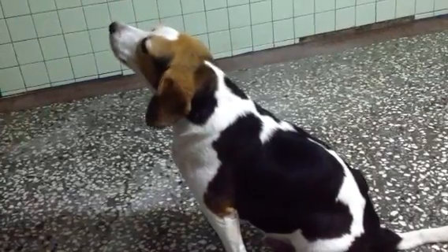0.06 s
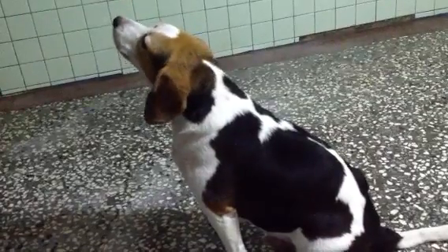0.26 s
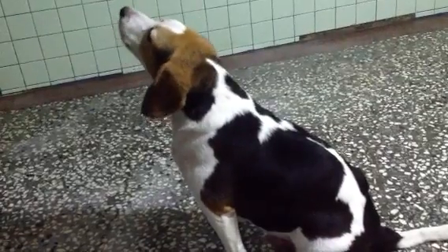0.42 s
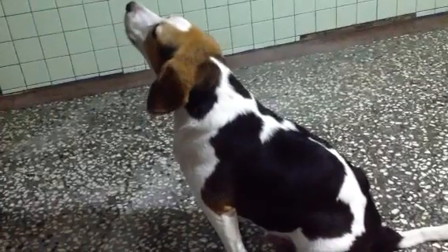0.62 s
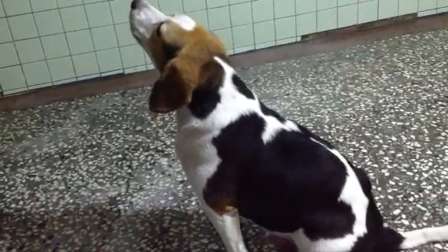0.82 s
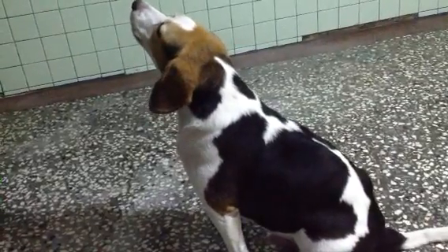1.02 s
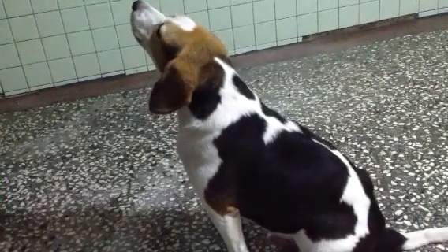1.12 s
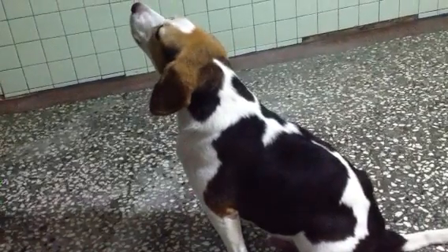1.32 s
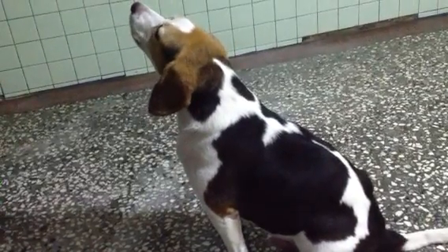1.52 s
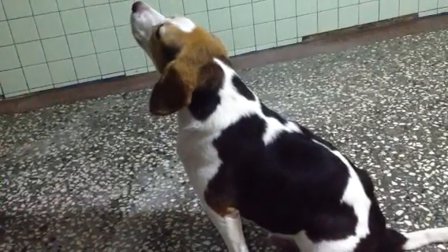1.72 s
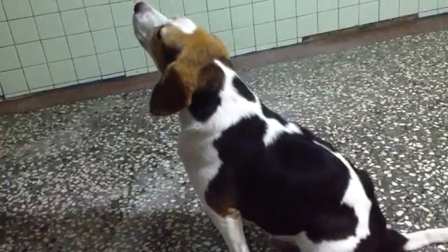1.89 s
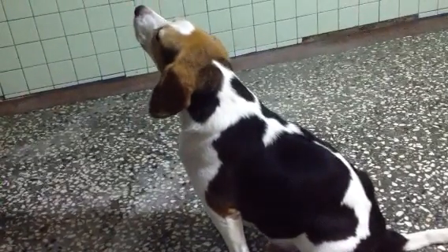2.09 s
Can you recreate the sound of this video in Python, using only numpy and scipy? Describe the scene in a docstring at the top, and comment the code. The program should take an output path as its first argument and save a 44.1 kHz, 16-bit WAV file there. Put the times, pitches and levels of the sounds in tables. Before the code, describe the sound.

A beagle gives one long, clear howl, rising early, then sinking in two steps and breaking off in small catches; a hard tiled room rings around it, close microphone, faint room noise.

```python
"""A beagle gives one long howl in a tiled room with a stone floor, over faint room noise.
The pitch rises, then sinks in two steps. Five harmonics on one gliding pitch carry the tone; flickering overtones
and pulsing breath noise ride on it, and the hard walls ring on as a dense tail of decaying noise.
A soft rush of shaped noise comes early; held-over notes beat with the new pitch and a few low bumps pass beneath.
At the end the voice catches in short, unsteady bursts, and a last soft rush of air follows."""
import sys
import numpy as np
from scipy import signal
from scipy.fft import rfft, irfft
from scipy.io import wavfile

SR = 44100
rng = np.random.default_rng(int(sys.argv[2]) if len(sys.argv) > 2 else 0)


def bounce(signal):
    """Save signal as a 16-bit WAV file at the path given by the first command-line argument."""
    frames = np.transpose(np.atleast_2d(signal))
    limited = np.clip(frames, -1, 1)
    pcm = np.round(limited * 32767).astype(np.int16)
    wavfile.write(sys.argv[1], SR, pcm)


N = 94815

# Centre line of the howl's pitch: start_s, pitch_hz
PITCH = [(0, 376.8), (0.11, 382.8), (0.23, 377.2), (0.32, 368.2), (0.38, 375.7), (0.44, 401), (0.55, 407.9),
         (0.66, 405.3), (0.81, 400.9), (0.9, 390.2), (0.96, 378.6), (1.02, 362.3), (1.1, 360.3),
         (1.22, 363.1), (1.36, 360.1), (1.49, 349.3), (1.6, 334.4), (1.7, 336.7), (1.82, 335.6)]


def undb(db):
    """Decibels to an amplitude factor."""
    return 10 ** (np.asarray(db) / 20)


def curve(table, column):
    """One column of a table, joined by straight lines in time."""
    rows = np.array(table)
    return np.interp(np.arange(N) / SR, rows[:, 0], rows[:, column])


def colour(hz, points):
    """Gain of a spectrum at hz, falling 120 dB per octave beyond its ends."""
    f, db = np.array(points).T
    octaves_beyond = np.abs(np.log2((hz + 1) / np.clip(hz + 1, f[0], f[-1])))
    return undb(np.interp(np.log(hz + 1), np.log(f), db) - 120 * octaves_beyond)


def unit(x):
    """Scale to an rms of 1."""
    return x / np.sqrt(np.mean(x ** 2))


def noise(points):
    """Noise of a given colour, rms 1."""
    spectrum = rfft(rng.standard_normal(N))
    return unit(irfft(spectrum * colour(np.fft.rfftfreq(N, 1 / SR), points), N))


def walk(hz):
    """Smooth random drift up to a given rate, rms 1."""
    smoother = signal.butter(2, hz, fs=SR, output="sos")
    return unit(signal.sosfilt(smoother, rng.standard_normal(N)))


def swell(at, length):
    """A bell-shaped envelope, down to 1/e at one length either side of its peak."""
    return np.exp(-((np.arange(N) / SR - at) / length) ** 2)


def room_noise():
    """Steady noise, strongest in the low mids."""
    # Spectrum of the room noise: frequency_hz, relative_level_db
    floor_colour = [(30, -30.5), (80, -16), (110, -14.5), (160, 2.5), (300, 2), (700, 5), (1200, -10.5),
                    (2000, -26), (3600, -21), (4800, -22.5), (6500, -11), (9000, -15), (12300, -15),
                    (14000, -28.5)]
    floor_db = -53
    return undb(floor_db) * noise(floor_colour)


def harmonic_levels():
    """Level curves in dB of harmonics 1-5, before trim and wobble."""
    # The two strong harmonics: start_s, first_db, second_db
    low_harmonics = [(0.0, -22, -34), (0.076, -32, -31.5), (0.106, -28, -41), (0.152, -24, -29),
                     (0.186, -27, -29), (0.278, -20, -19.5), (0.304, -19, -36), (0.334, -20.5, -22.5),
                     (0.354, -16, -30.5), (0.384, -12, -24), (0.43, -15, -16), (0.48, -15, -16.5),
                     (0.5, -9, -25), (0.592, -7.5, -27.5), (0.648, -10.5, -26.5), (0.76, -24.5, -18.5),
                     (0.8, -32.5, -20.5), (0.84, -14, -17.5), (0.866, -14.5, -17.5), (0.902, -16.5, -31),
                     (0.926, -22, -28.5), (0.958, -15, -20), (1.028, -21.5, -12.5), (1.068, -17.5, -7),
                     (1.104, -23, -13), (1.154, -24, -7.5), (1.242, -23, -12), (1.358, -24, -10),
                     (1.394, -26, -26.5), (1.428, -25.5, -11.5), (1.494, -36, -21), (1.748, -32, -16),
                     (1.82, -35, -17)]
    # The next three: start_s, third_db, fourth_db, fifth_db
    mid_harmonics = [(0, -65, -51.5, -52.5), (0.18, -71.5, -48, -65), (0.25, -39, -35, -48.5),
                     (0.3, -42.5, -31, -42.5), (0.37, -30, -23, -44), (0.44, -41, -28, -57.5),
                     (0.52, -40, -29.5, -55), (0.62, -45.5, -24, -59), (0.72, -49, -23, -55.5),
                     (0.81, -35, -32, -61.5), (0.88, -47.5, -29.5, -56), (0.95, -49.5, -34.5, -64.5),
                     (1.02, -48, -25.5, -43.5), (1.13, -51.5, -32.5, -37.5), (1.22, -55, -33.5, -48),
                     (1.3, -49, -31.5, -63), (1.37, -47.5, -41.5, -27), (1.44, -40.5, -32.5, -38.5),
                     (1.5, -41.5, -39.5, -22), (1.57, -45, -41.5, -42.5), (1.64, -38, -37, -37.5),
                     (1.74, -36, -35, -38.5), (1.83, -38, -47, -32.5)]
    low = [curve(low_harmonics, column) for column in (1, 2)]
    mid = [curve(mid_harmonics, column) for column in (1, 2, 3)]
    return low + mid


def vocal_folds(phase, levels):
    """The folds sound five harmonics locked to one phase, each shimmering and fluttering in level."""
    # Trim of harmonics 1-5: trim_db
    trim = [-1.3, 0.23, -0.06, -0.76, -1.5]
    # Flutter of harmonics 1-5, mostly deeper in the upper three: rms_depth_db
    flutter = [.2, 0.66, 3, 1.9, 1.9]
    flutter_hz = 20.1
    shimmer_db, shimmer_hz = 0.133, 121
    tone = 0
    for k, db in enumerate(levels):
        wobble_db = shimmer_db * walk(shimmer_hz) + flutter[k] * walk(flutter_hz)
        tone = tone + undb(db + trim[k] + wobble_db) * np.sqrt(2) * np.sin((k + 1) * phase)
    return tone


def throat_air(levels, puffs):
    """Air rasps through the throat in puffs, louder as the harmonics grow."""
    # Spectrum of the rasp: frequency_hz, relative_level_db
    rasp_colour = [(120, -6), (300, -23), (400, 5), (550, -14.5), (750, 20.5), (950, -4.5), (1200, -23),
                   (1350, 4), (1600, -5), (1800, 12), (2050, -41), (3000, -45)]
    rasp_db = -36  # relative to the untrimmed harmonics
    effort = np.sqrt(sum(undb(db) ** 2 for db in levels))
    return undb(rasp_db) * effort * puffs * noise(rasp_colour)


def flickering_overtone(order, phase):
    """One high harmonic whose level drifts slowly up and down."""
    flicker_db, flicker_hz = 4.5, 4.3
    start_phase = rng.uniform(0, 2 * np.pi)
    return undb(flicker_db * walk(flicker_hz)) * np.sin(order * phase + start_phase)


def treble(hz, phase, puffs):
    """Three ranges of thin overtones, each mixed with pulsing hiss of the same colour."""
    # Range levels before the shares below: start_s, range_2_4_khz_db, range_6_10_khz_db, above_11_khz_db
    treble_levels = [(0, -59, -53.5, -59), (0.22, -51.5, -52.5, -63), (0.32, -54.5, -43.5, -49),
                     (0.4, -42, -34, -49.5), (0.47, -42.5, -29.5, -44), (0.58, -50, -30.5, -43.5),
                     (0.7, -45, -38, -44.5), (0.82, -46.5, -41, -46.5), (0.91, -50.5, -41.5, -48),
                     (1.02, -48.5, -37.5, -47.5), (1.1, -55, -40, -52.5), (1.2, -55, -43.5, -54),
                     (1.4, -52, -44, -53), (1.52, -56.5, -48, -56.5), (1.66, -52.5, -45.5, -50),
                     (1.79, -57.5, -48.5, -49), (1.84, -63, -49.5, -54)]
    # Colours of the three ranges, low to high: frequency_hz, relative_level_db
    presence = [(1980, -9), (2160, 5.5), (2330, -12), (2450, 5.5), (2680, 2.5), (2900, -11), (3100, -3.5),
                (3270, 2), (3480, -13.5), (3720, -2.5), (4050, -15.5), (4350, -17), (4700, -21),
                (5400, -16.5)]
    whistle = [(5400, -37), (6200, -9.5), (6900, -9.5), (7450, -15), (8100, 0), (8600, 3), (9050, 5),
               (9350, -14.5), (9750, -1), (10300, -29), (11000, -22.5)]
    top = [(10500, -11.5), (11300, -6.5), (12000, 4), (12600, -1), (13100, -8.5), (13700, -10.5),
           (15400, -9.5)]
    # Clean and airy share of each range, low to high: share_db
    clean_share = [-6, -8, -11]
    hiss_share = [-13.5, -16.5, -8.5]
    out = 0
    for i, shape in enumerate([presence, whistle, top]):
        low_hz, high_hz = shape[0][0], shape[-1][0]
        orders = [k for k in range(6, 46) if k * hz.max() > low_hz and k * hz.min() < high_hz]
        lines = unit(sum(colour(k * hz, shape) * flickering_overtone(k, phase) for k in orders))
        hiss = puffs * noise(shape)
        mix = undb(clean_share[i]) * lines + undb(hiss_share[i]) * hiss
        out = out + undb(curve(treble_levels, i + 1)) * mix
    return out


def howl():
    """Vocal folds, throat air and treble share one unsteady pitch, with held-over notes added."""
    jitter, jitter_hz = 0.0014, 142  # rms share of the pitch, fastest rate
    waver, waver_hz = 0.0023, 22.6
    attack_s = 0.008
    end_s, release_s = 1.8105, 0.061
    t = np.arange(N) / SR
    hz = curve(PITCH, 1) * (1 + jitter * walk(jitter_hz) + waver * walk(waver_hz))
    phase = 2 * np.pi * np.cumsum(hz) / SR
    puffs = unit(1 + 0.18 * np.cos(phase))  # the air pulses once a cycle
    levels = harmonic_levels()
    voice = vocal_folds(phase, levels) + throat_air(levels, puffs) + treble(hz, phase, puffs)
    attack = np.minimum(t / attack_s, 1)
    release = np.exp(-(np.maximum(t - end_s, 0) / release_s) ** 2)
    return voice * attack * release + lingering(phase)


def room(x):
    """Tiles and stone add a dense tail, with its own level and decay in each band."""
    # Tail in each band: centre_hz, level_db
    tail_levels = [(200, -14), (380, -15), (720, -15), (1100, -8), (1600, -5), (3000, -1), (8500, 1),
                   (15000, 0)]
    # Time to fall 60 dB in those bands: decay_s
    tail_decays = [.55, 1, 0.65, 1, 0.91, 1, 0.25, 0.35]
    delay_s = 0.005804
    t, f = np.arange(SR) / SR, np.fft.rfftfreq(SR, 1 / SR)
    centres = np.log([row[0] for row in tail_levels])
    scatter, tail = rfft(rng.standard_normal(SR)), 0
    # Each row of the identity matrix gives one band, crossfading into its neighbours
    for share, (_, db), t60 in zip(np.eye(len(tail_levels)), tail_levels, tail_decays):
        band = irfft(scatter * np.interp(np.log(f + 1), centres, share), SR)
        fade = undb(-60 * t / t60) * (t > delay_s)
        tail = tail + undb(db) * band * fade / np.linalg.norm(fade)
    return x + signal.fftconvolve(x, tail)[:N]


def air_rushes():
    """Soft rushes of air: shaped noise that swells and sinks."""
    # Rushes: peak_s, half_width_s, peak_level_db
    rushes = [(0.124, 0.19, -55), (2.037, 0.14, -52.5)]
    # Spectrum of the air: frequency_hz, relative_level_db
    rush_colour = [(400, -8.5), (1200, -1), (1800, 1), (2500, -5.5), (3100, -10.5), (3750, -7.5),
                   (4600, -23.5), (8000, -20), (10300, -9.5), (13000, -24)]
    return noise(rush_colour) * sum(undb(db) * swell(at, length) for at, length, db in rushes)


def lingering(phase):
    """Where the pitch slides away, the old note lingers in the room and beats with the new one."""
    # Held-over notes, levels before the fade: start_s, first_db, second_db, third_db, fourth_db, fifth_db
    held_notes = [(0.386, -19.5, -10.5, -37.5, -25.5, -53), (0.94, -18.5, -11, -47, -28.5, -57),
                  (1.479, -48.5, -28.5, -42.5, -37, -33.5)]
    rise_s, t60_s = 0.032, 0.48
    t, out = np.arange(N) / SR, 0
    for at, *levels in held_notes:
        age = np.maximum(t - at, 0)
        held_hz = np.interp(at, t, curve(PITCH, 1))
        held_phase = np.interp(at, t, phase) + 2 * np.pi * held_hz * age
        rise = 1 - np.exp(-(age / rise_s) ** 2)
        decay = np.exp(-np.log(1000) * age / t60_s)
        note = sum(undb(db) * np.sqrt(2) * np.sin((k + 1) * held_phase) for k, db in enumerate(levels))
        out = out + rise * decay * note
    return out


def low_bumps():
    """Low bumps: brief swells of mostly deep noise."""
    # Bumps: peak_s, peak_level_db
    bumps = [(.555, -65), (0.591, -61), (1.055, -50), (1.149, -59)]
    # Spectrum of a bump: frequency_hz, relative_level_db
    bump_colour = [(20, 3), (70, 2), (200, -17.5), (800, -2.5), (2000, -19.5), (6000, -16.5), (12000, -51)]
    half_width_s = 0.011
    return noise(bump_colour) * sum(undb(db) * swell(at, half_width_s) for at, db in bumps)


def catches():
    """Short, unsteady two-harmonic bursts of the folds as the voice lets go."""
    # Bursts: peak_s, half_width_s, pitch_hz, glide_hz_per_s, first_db, second_db
    bursts = [(1.843, .012, 368, 701, -29.5, -27.5), (1.884, 0.012, 411, 9, -36.5, -50),
              (1.901, .017, 362.6, 1001, -41, -25.5), (1.954, 0.029, 354, 0, -44, -33)]
    jitter, jitter_hz = 0.01, 130  # rms share of the pitch, fastest rate
    t, out = np.arange(N) / SR, 0
    for at, length, hz, glide, first_db, second_db in bursts:
        gliding_hz = hz + glide * np.clip(t - at, -2 * length, 2 * length)
        phase = 2 * np.pi * np.cumsum(gliding_hz * (1 + jitter * walk(jitter_hz))) / SR
        tone = undb(first_db) * np.sin(phase) + undb(second_db) * np.sin(2 * phase)
        out = out + np.sqrt(2) * swell(at, length) * tone
    return out


def scene():
    """The dog, cleared of rumble, rings in its room over the background."""
    low_cut = signal.butter(4, 85, "high", fs=SR, output="sos")  # Hz
    dog = signal.sosfilt(low_cut, howl() + catches())
    background = room_noise() + air_rushes() + low_bumps()
    return (room(dog) + background)[None]


def record(dry):
    """The recorder cuts the top steeply, above 15.4 kHz."""
    top_cut = signal.ellip(10, 0.1, 80, 15400, fs=SR, output="sos")  # ripple dB, rejection dB, Hz
    return signal.sosfilt(top_cut, dry)


dry = scene()
out = record(dry)
bounce(out)
```